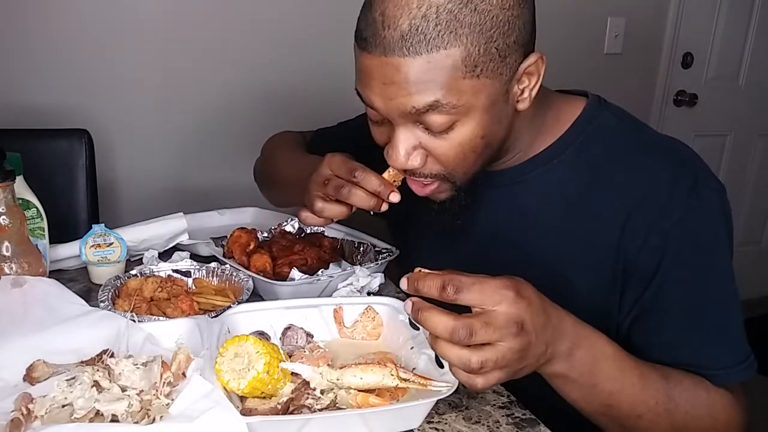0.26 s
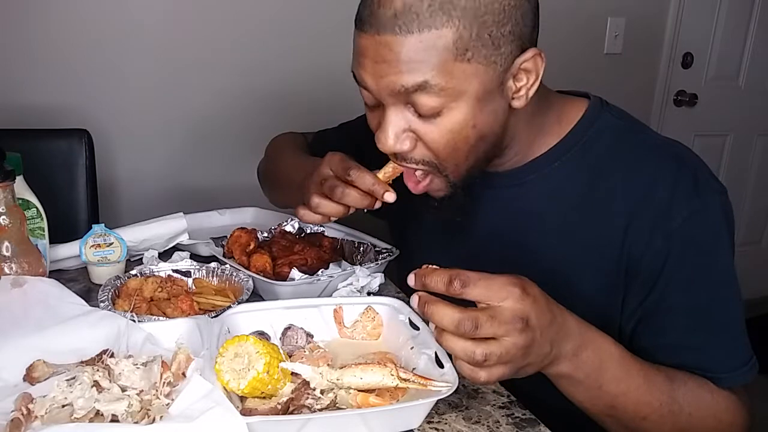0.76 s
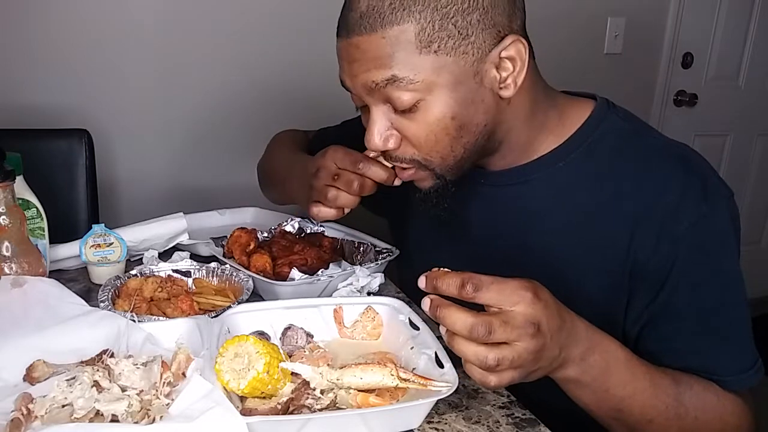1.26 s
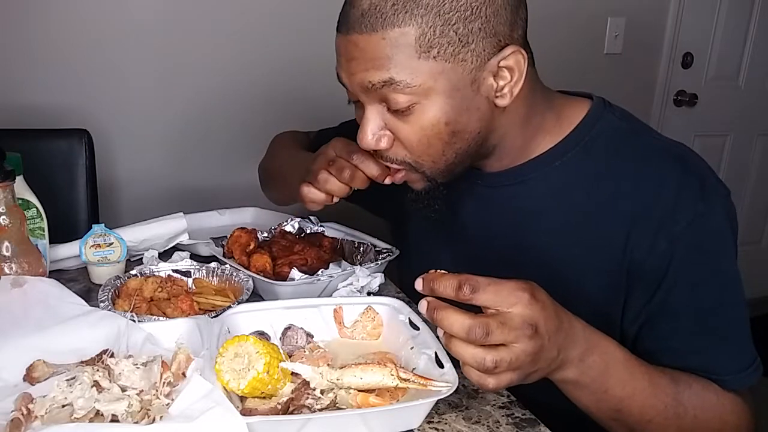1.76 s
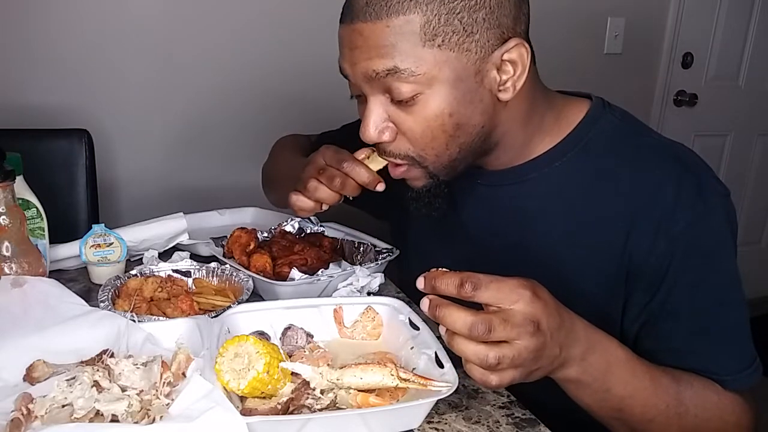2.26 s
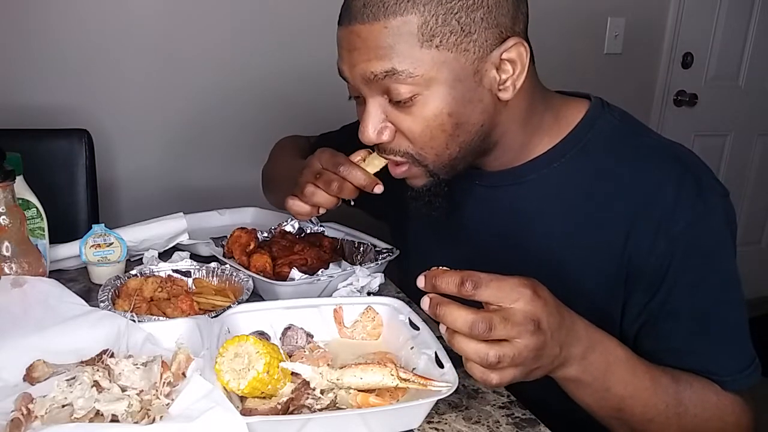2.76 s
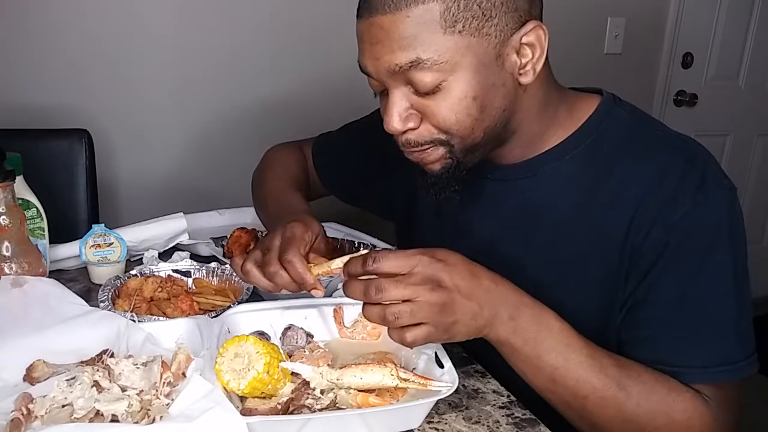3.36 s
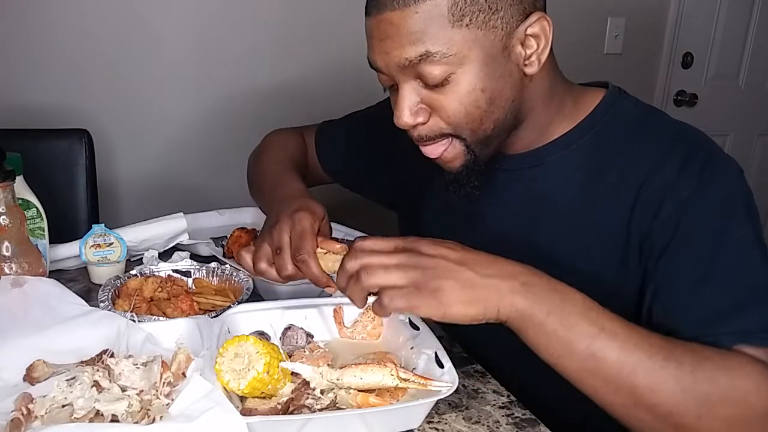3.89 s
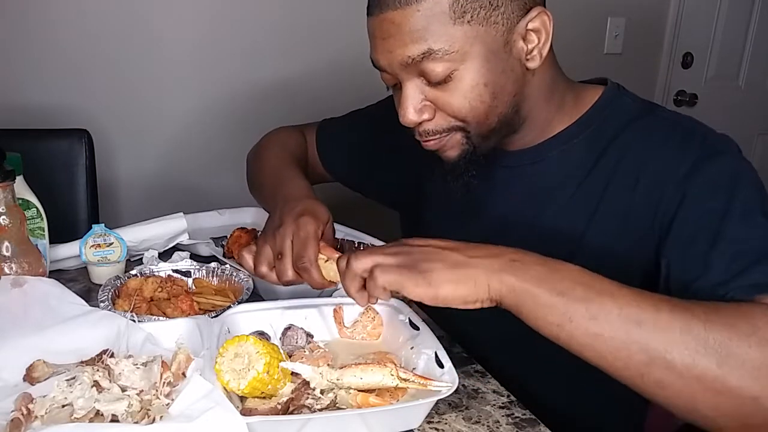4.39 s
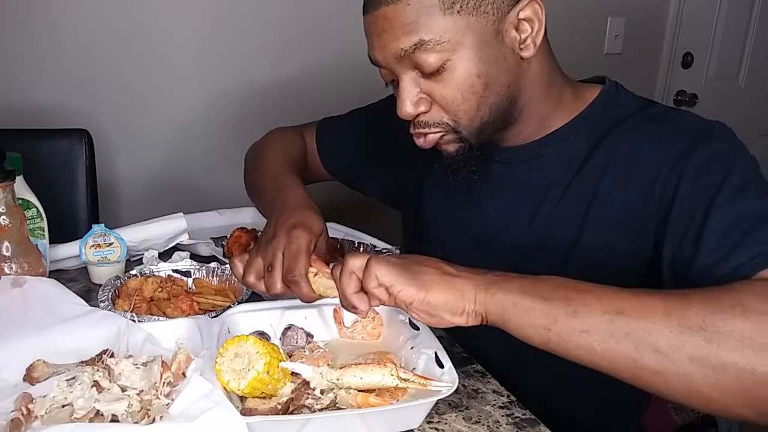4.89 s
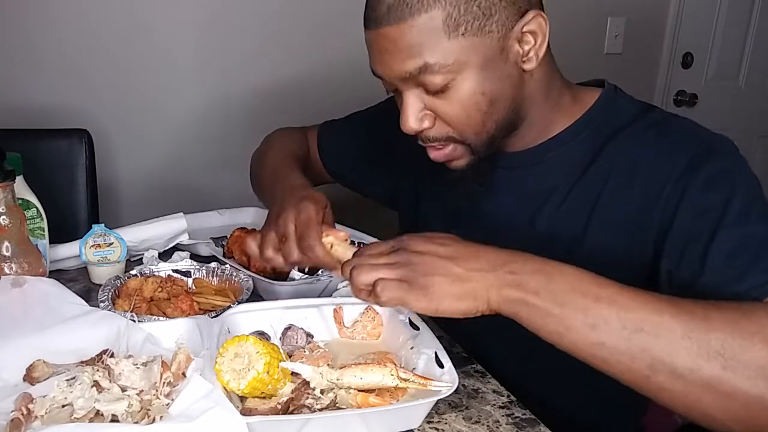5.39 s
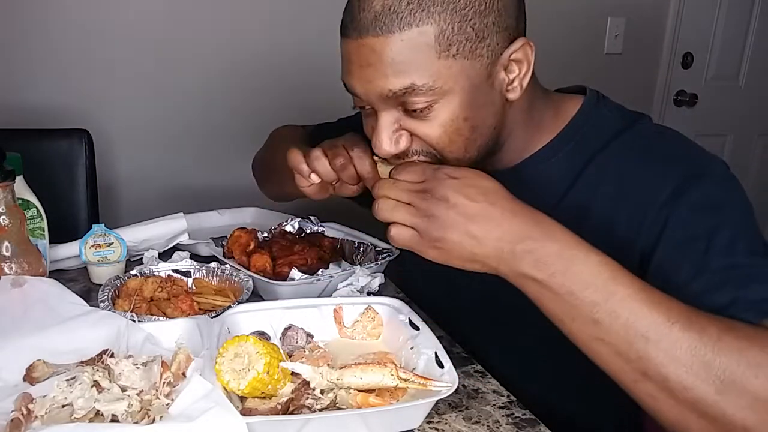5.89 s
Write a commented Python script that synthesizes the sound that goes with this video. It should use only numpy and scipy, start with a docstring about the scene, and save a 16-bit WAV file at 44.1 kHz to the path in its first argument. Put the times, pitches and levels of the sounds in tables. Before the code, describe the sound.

Someone bites open a crab leg close to the microphone in a small, hard-walled room. Faint ticks build to a loud, splintering crunch. More sharp cracks follow, with wet meat tearing softly between them and one dull knock of teeth. After a lull with a few ticks come some last snaps and a soft tear. Low rumble, hiss and a thin whine lie underneath.

```python
"""A crab leg is bitten open at a table in a small, hard-walled room, over rumble, hiss and a thin whine.
Faint ticks build to a loud crunch at 0.5 s, each crack a millisecond burst of splintering that rings
the shell and the hollow of the mouth. From 1 s to 3 s wet meat tears softly between more cracks,
and at 2.3 s the teeth knock together once. A lull with a few ticks follows,
then a last run of snaps and one soft tear from 5.5 s."""
import sys
import numpy as np
from scipy import signal
from scipy.fft import rfft, irfft
from scipy.io import wavfile
from scipy.ndimage import uniform_filter1d

SR = 44100
rng = np.random.default_rng(int(sys.argv[2]) if len(sys.argv) > 2 else 0)


def transcribe(signal):
    """Save signal, clipped to [-1, 1], as a 16-bit WAV file at the path in sys.argv[1]."""
    frames = np.atleast_2d(signal).T
    limited = np.clip(frames, -1, 1)
    pcm = np.round(limited * 32767).astype(np.int16)
    wavfile.write(sys.argv[1], SR, pcm)


N = 270774

# Tone of the rumble: freq_hz, relative_db
RUMBLE_SPECTRUM = [(20, -13), (45, -56), (68, -9.5), (110, -2), (160, 1.5), (220, 0), (340, -3.5),
                   (460, -9.5), (620, -18.5), (1200, -25), (3000, -39)]
# Three swells of the rumble: start_s, hold_until_s, rumble_lift_db, deep_bass_lift_db
RUMBLE_SWELLS = [(-.2, 1.76, 4, 1), (2.0, 3.06, 8, 11.5), (4.2, 4.88, 4, 11.5)]
# Tone of the hiss: freq_hz, relative_db
HISS_SPECTRUM = [(100, -1), (700, 7), (1300, 5), (2200, 2), (4500, -2), (7300, -1), (8300, -7.5),
                 (10000, -8.5), (13000, -5.5), (16000, -3)]
# Decay of the room's tail: freq_hz, t60_s
ROOM_DECAY = [(300, 0.31), (1400, 0.42), (2600, 0.37), (3900, 0.39), (5500, 0.4), (8000, 0.36),
              (14000, 0.26)]
# Tone of the room's tail: freq_hz, gain_db
ROOM_EQ = [(300, 8.5), (900, -1.5), (1500, 0), (2000, -5.5), (2550, 3), (3200, -1.5), (4400, 0.5),
           (5600, 4), (7500, -6.5), (10000, 0), (15000, -6)]
# First reflections off table and walls: delay_s, gain
EARLY_REFLECTIONS = [(.0026, 0.053), (.0058, 0.053), (0.01, 0.37), (0.0126, .17), (0.0211, 0.16)]
# Resonance of the mouth round the shell: time_s, pitch_hz
MOUTH_RESONANCE = [(.8, 1450), (1.05, 1135), (1.6, 1050), (1.95, 1140), (2.6, 1190), (2.8, 1270),
                   (4.1, 1320), (5.5, 1700)]
# Pulls at the wet meat: start_s, length_s, relative_mouth_db, relative_crackle_db
MEAT_PULLS = [(0.985, 0.099, -62.5, -57), (1.192, 0.16, -53, -47.5), (1.476, 0.23, -60.5, -60.5),
              (1.88, 0.089, -52, -42.5), (2.002, 0.039, -66, -52), (2.16, 0.13, -62.5, -63),
              (2.475, 0.19, -61, -63.5), (2.684, 0.24, -58, -58.5), (5.601, 0.27, -67, -65)]
# Ring of the teeth as they close through the shell: pitch_hz, level_db, t60_s
TEETH_MODES = [(443, -21.5, 0.021), (940, -11.5, 0.0097), (1130, -13, 0.011), (2760, -25, 0.016)]
# Tone that all fractures share: freq_hz, gain_db
SHELL_EQ = [(600, -15.5), (1000, -14.5), (1500, -6.5), (2000, -8), (3200, -5), (6300, 1.6), (12000, -9.5)]
# Resonances of the whole hollow leg: pitch_hz, width_hz, lift_db
LEG_MODES = [(3590, 550, 4), (7410, 790, 5.5), (12700, 1700, 4)]
# The break moves from plate to plate of the shell, each facing the room another way:
# start_s, pitch_hz, lift_db, room_send_db
SHELL_PLATES = [(0, 3800, 8, -4), (.42, 2420, 9, -4.5), (.55, 2300, 13, -6), (.57, 2300, -1, -1),
                (1.0, 3420, 7.5, 0), (1.99, 2600, 7, -1.5), (3.1, 3460, 2, -1.5), (4.5, 3140, 13.5, -5.5),
                (5.6, 3700, 1.5, -2.5)]
# Fractures of the shell: start_s, strength_db, boom_db, treble_tilt_db_per_octave, snap_pitch_hz
FRACTURES = [(0.0785, -30.5, 16, -8.5, 7500), (0.1523, -29, 12, -1, 4900), (0.326, -12, 10, -1.5, 5740),
             (0.4016, -10, -3, -1, 7900), (0.4424, -0.5, 2, -2, 7600), (0.4572, 2, 8.5, -1, 5000),
             (0.5339, 7.5, 0, -3.5, 5430), (0.5543, 11.5, 8.5, -0.5, 7540), (0.5673, -2, -14, 3, 5350),
             (0.5768, 10.5, 14.5, 0, 5460), (0.5881, 5.5, -10, -2.5, 5370), (1.103, -19, 2, -1, 5900),
             (1.198, -18.5, -4, 0, 5600), (1.2211, -14, -13, 1, 5650), (1.253, 0.5, -6, 0, 7500),
             (1.2695, -4.5, 3, -0.5, 6700), (1.2777, -1, 4, 1.5, 6800), (1.3663, -13, 6, -4, 7400),
             (1.3911, 6.5, -11, -1, 7450), (1.517, -25.5, 11, -14.5, 7200),
             (1.6331, -29.5, 14.5, -14, 6100), (1.8462, -23, -1, -8, 4000), (1.8777, -7, -16, -1.5, 6400),
             (1.9129, -8, -1.5, 0.5, 7500), (1.9349, -10, -1, 0, 7550), (2.002, -17, -2, -14, 5300),
             (2.0243, -16, -1, -8.5, 5800), (2.1847, -27.5, 12, -5, 6850), (2.297, -11.5, 11, -0.5, 6500),
             (2.3215, -10, 2, -3, 6300), (2.352, 0, 9.5, -1, 5970), (2.3654, -11, -1, -5, 6040),
             (2.388, -8.5, -6, 1, 7000), (2.5057, -20.5, -18, -4, 3600), (2.842, -2.5, 8.5, 3.5, 6630),
             (3.2143, -19, 8, -6, 6200), (4.0907, -38, 20.5, -11, 7700), (4.2892, -22, -7, -7.5, 6700),
             (4.664, -28, -5, -22, 7750), (5.5277, -7.5, 8.5, -6, 6030), (5.7144, -25.5, 12, -4, 6360),
             (5.7726, -25.5, 3, -5, 4860), (5.941, -26, 8, -5, 6400), (6.0615, -20.5, 3, 4, 7100),
             (6.0985, -10, -1, -2, 6960)]


def amp(db):
    """Decibels to gain."""
    return 10 ** (np.asarray(db) / 20)


def unit_rms(x):
    """Scales to rms 1."""
    return x / np.sqrt(np.mean(x ** 2) + 1e-20)


def curve_at(points, hz):
    """Reads a curve on a log-frequency axis."""
    freqs, values = np.transpose(points)
    return np.interp(np.log(hz + 1), np.log(freqs + 1), values)


def add(mix, start_s, sound):
    """Mixes a sound in at its start time."""
    part = mix[max(round(start_s * SR), 0):][:len(sound)]
    part += sound[:len(part)]


def bell(hz, centre_hz, width_hz):
    """Bell of height 1 round a resonance."""
    return 1 / (1 + (2 * (hz - centre_hz) / width_hz) ** 2)


def minimum_phase(gain):
    """Filter response with this gain that rings only after it is struck."""
    log_gain = np.log(np.maximum(gain, 1e-6))
    mirrored = np.concatenate([log_gain, log_gain[-2:0:-1]])
    return np.exp(np.conj(signal.hilbert(mirrored)))[:len(gain)]


def noise(gain):
    """Steady noise of rms 1, shaped by the function gain(hz)."""
    return unit_rms(irfft(rfft(rng.standard_normal(N)) * gain(np.fft.rfftfreq(N, 1 / SR)), N))


def background(rumble_db=-55, deep_db=-68.5, hiss_db=-57.5, whine_db=-68.5, rise_s=0.19, fall_s=0.76):
    """The bed: a low rumble that swells and sinks, steady hiss and a thin electrical whine."""
    t = np.arange(N) / SR
    swells = []
    for start_s, hold_until_s, *lifts_db in RUMBLE_SWELLS:
        envelope = np.minimum((t - start_s) / rise_s, 1 - (t - hold_until_s) / fall_s)
        swells.append(np.outer(lifts_db, np.clip(envelope, 0, 1)))
    rumble_lift_db, deep_lift_db = np.max(swells, axis=0)
    rumble = noise(lambda hz: amp(curve_at(RUMBLE_SPECTRUM, hz))) * amp(rumble_db + rumble_lift_db)
    deep = noise(lambda hz: bell(hz, centre_hz=82, width_hz=55) ** 2) * amp(deep_db + deep_lift_db)
    hiss = noise(lambda hz: amp(curve_at(HISS_SPECTRUM, hz))) * amp(hiss_db)
    whine = noise(lambda hz: bell(hz, centre_hz=7700, width_hz=440) ** 2) * amp(whine_db)
    return rumble + deep + hiss + whine


def room_impulse(tail_db=2.2, build_s=0.0023, size=32768):
    """A few reflections from table and walls, and a dense tail whose top end dies first."""
    hz, t, bands = signal.stft(rng.standard_normal(size), SR, nperseg=256)
    decay = amp(-60 * t / curve_at(ROOM_DECAY, hz)[:, None])
    tail = signal.istft(bands * decay, SR, nperseg=256)[1][:size]
    fade_in = 1 - np.exp(-(np.arange(size) / SR / build_s) ** 2)
    spectrum = rfft(tail * fade_in)
    contour = np.sqrt(uniform_filter1d(abs(spectrum) ** 2, size=120))
    eq = amp(tail_db + curve_at(ROOM_EQ, np.fft.rfftfreq(size, 1 / SR)))
    response = irfft(spectrum * minimum_phase(eq / contour))
    for delay_s, gain in EARLY_REFLECTIONS:
        add(response, delay_s, np.array([gain]))
    return response


def room(send, cycle_hz=13):
    """Each fracture throws its sound a different way: the send crossfades round four reverbs."""
    angle = 2 * np.pi * cycle_hz * np.arange(N) / SR
    fades = [np.maximum(np.cos(angle + k * np.pi / 2), 0) for k in range(4)]
    return sum(signal.fftconvolve(send * fade, room_impulse())[:N] for fade in fades)


def mouth_pitch(time_s):
    """The mouth's resonance in Hz, gliding as the bite goes on."""
    return np.interp(time_s, *np.transpose(MOUTH_RESONANCE))


def meat_tearing(clicks_per_s=500, mouth_width_hz=270):
    """Wet fibres part in swarms of tiny clicks, which also sound the mouth's resonance."""
    t = np.arange(N) / SR
    clicks = rng.standard_normal(N) * (rng.random(N) < clicks_per_s / SR)
    crackle_band = bell(np.fft.rfftfreq(N, 1 / SR), centre_hz=5200, width_hz=4500)
    crackle = unit_rms(irfft(rfft(clicks) * crackle_band, N))
    # A gliding band-pass: shift down by the mouth's pitch, low-pass, shift back up.
    carrier = np.exp(2j * np.pi * np.cumsum(mouth_pitch(t)) / SR)
    pole = np.exp(-np.pi * mouth_width_hz / SR)
    smoothed = signal.lfilter([1], np.poly([pole, pole]), clicks / carrier)
    mouth = unit_rms((carrier * smoothed).real)
    out = np.zeros(N)
    for start_s, length_s, mouth_db, crackle_db in MEAT_PULLS:
        swell = np.sin(np.pi * np.clip((t - start_s) / length_s, 0, 1))
        out += swell * (amp(mouth_db) * mouth + amp(crackle_db) * crackle)
    return out


def teeth_knock(start_s=2.3326, attack_s=0.0017):
    """The teeth meet once, mid-bite, with a short, dull ring."""
    t = np.arange(4096) / SR
    ring = sum(amp(db - 60 * t / t60) * np.sin(2 * np.pi * hz * t) for hz, db, t60 in TEETH_MODES)
    out = np.zeros(N)
    add(out, start_s, ring * (1 - np.exp(-t / attack_s)))
    return out


def splinter_spectrum(size, attack_s=0.00015, decay_s=0.0016):
    """Tiny breaks crowd in at once and fade as the split runs on: a noise burst, evened in tone."""
    t = np.arange(size) / SR
    burst = rng.standard_normal(size) * (1 - np.exp(-t / attack_s)) * np.exp(-t / decay_s)
    spectrum = rfft(burst)
    contour = np.sqrt(uniform_filter1d(abs(spectrum) ** 2, size=70))
    return spectrum / minimum_phase(contour)


def small_splits(count=2, within_s=0.018, offset_db=-20.5):
    """Weaker splits of the same piece run on just after each fracture."""
    delays_s = within_s * rng.uniform(0.2, 1, (len(FRACTURES), count))
    return [(start_s + delay_s, strength_db + offset_db, *tone)
            for (start_s, strength_db, *tone), row in zip(FRACTURES, delays_s) for delay_s in row]


def crack(start_s, strength_db, boom_db, tilt_db_per_octave, snap_hz, plate_hz, plate_db,
          boom_octaves=0.66, tilt_from_hz=2880, tilt_pivot_hz=4330, bass_corner_hz=300, size=4096):
    """A fracture rings two resonances of the piece that breaks, the whole leg and the mouth behind it."""
    hz = np.fft.rfftfreq(size, 1 / SR)
    mouth_hz = mouth_pitch(start_s)
    # pitch_hz, width_hz, lift_db
    modes = [(plate_hz, 520, plate_db), (snap_hz, 1100, 7.5), (mouth_hz, 450, 8), *LEG_MODES]
    rings_db = sum(db * bell(hz, pitch, width) for pitch, width, db in modes)
    # The hollow booms in a broad band round the mouth's pitch; a sharper break is brighter.
    hollow_db = boom_db / (1 + (np.log2((hz + 1) / mouth_hz) / boom_octaves) ** 4)
    treble_db = tilt_db_per_octave * np.log2(np.maximum(hz, tilt_from_hz) / tilt_pivot_hz)
    tone_db = curve_at(SHELL_EQ, hz) + hollow_db + treble_db + rings_db
    radiated = hz ** 2 / (hz ** 2 + bass_corner_hz ** 2)  # a small shell gives off little bass
    gain = amp(strength_db + tone_db) * np.maximum(radiated, 0.02)
    return irfft(splinter_spectrum(size) * minimum_phase(gain))


def shell_cracks():
    """The shell gives way plate by plate; returns the direct sound and the room send."""
    direct, send = np.zeros((2, N))
    for start_s, *fracture in FRACTURES + small_splits():
        plate_index = sum(start_s >= plate[0] for plate in SHELL_PLATES[1:])
        _, plate_hz, plate_db, send_db = SHELL_PLATES[plate_index]
        sound = crack(start_s, *fracture, plate_hz, plate_db)
        add(direct, start_s, sound)
        add(send, start_s, sound * amp(send_db))
    return direct, send


def scene(meat_trim_db=-3, teeth_send_db=-6):
    """The mono mix: shell, meat and teeth in the room, over the background bed."""
    shell, shell_send = shell_cracks()
    meat = meat_tearing() * amp(meat_trim_db)
    teeth = teeth_knock()
    reverb = room(shell_send + meat + teeth * amp(teeth_send_db))
    return (shell + meat + teeth + reverb + background())[None]


def record(dry, low_cut_hz=58, deep_bass_db=-16, ceiling=0.9, high_cut_hz=15900):
    """The microphone sheds the deepest bass, the sharpest peaks clip, and the very top is cut."""
    thinned = signal.sosfilt(signal.butter(5, low_cut_hz, "high", fs=SR, output="sos"), dry)
    clipped = np.clip(thinned + amp(deep_bass_db) * (dry - thinned), -ceiling, ceiling)
    low_pass = signal.firwin(511, high_cut_hz, window=("kaiser", 9), fs=SR)
    return signal.oaconvolve(clipped, low_pass[None], "same")


dry = scene()
out = record(dry)
transcribe(out)
```